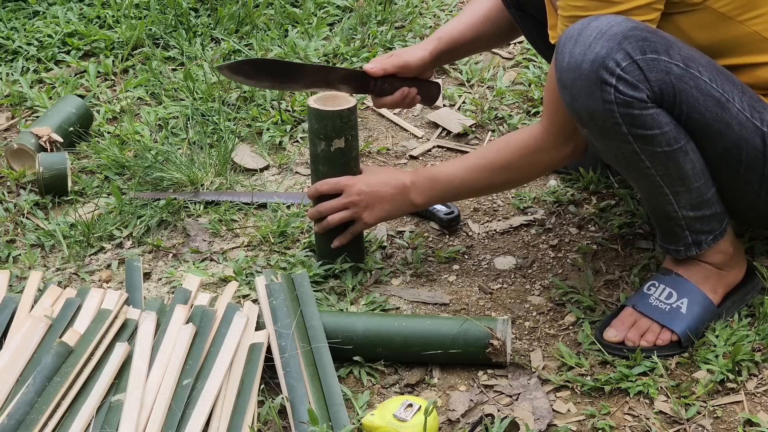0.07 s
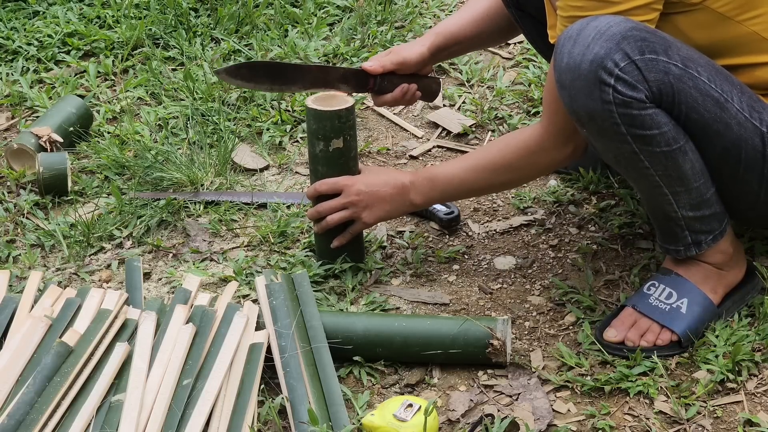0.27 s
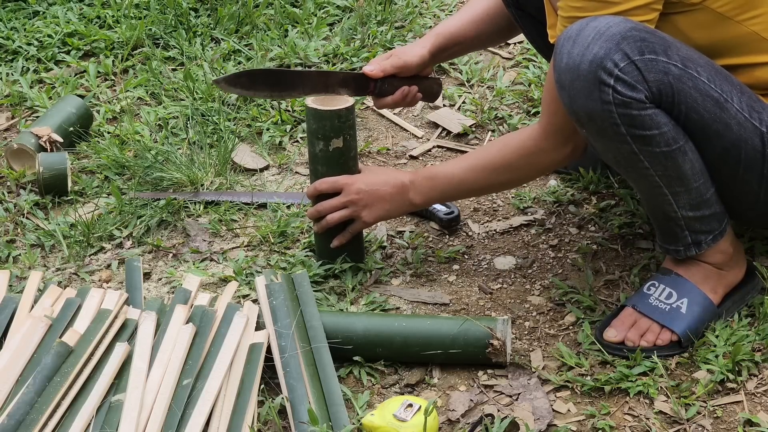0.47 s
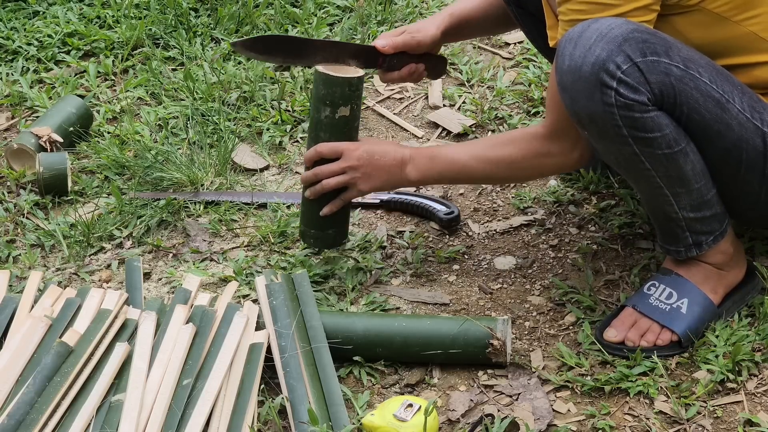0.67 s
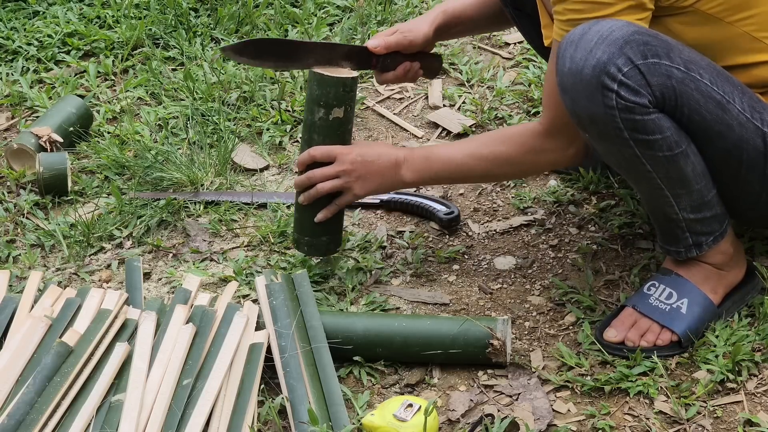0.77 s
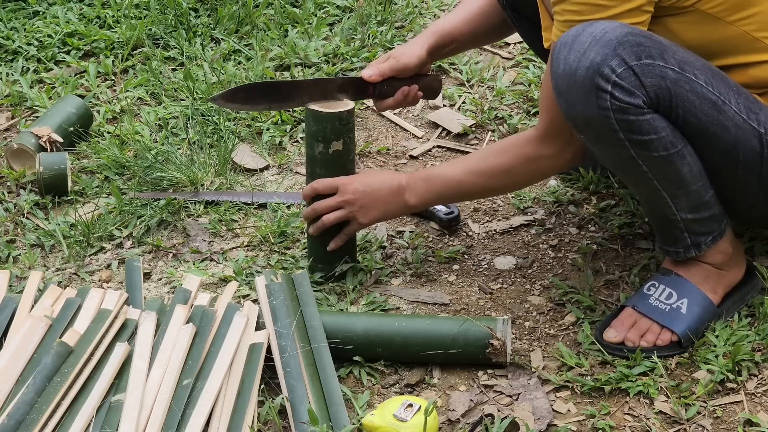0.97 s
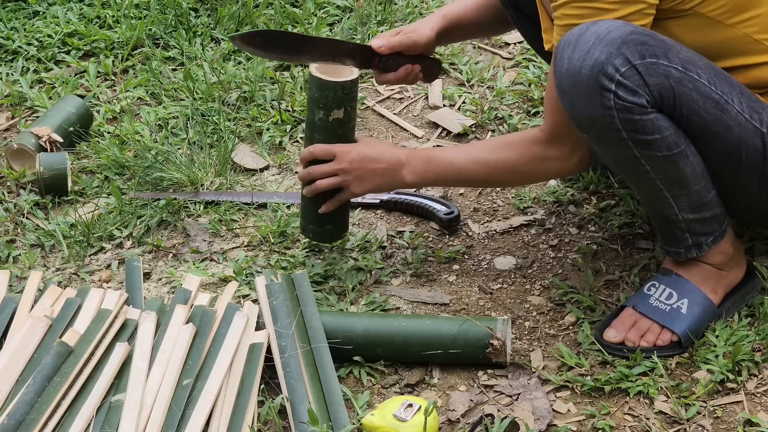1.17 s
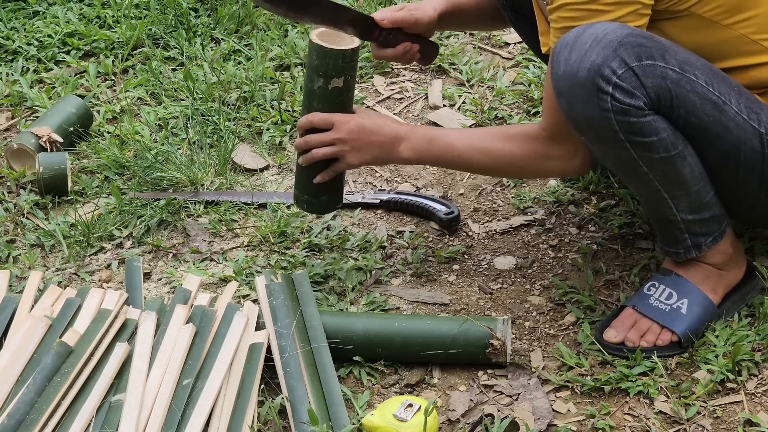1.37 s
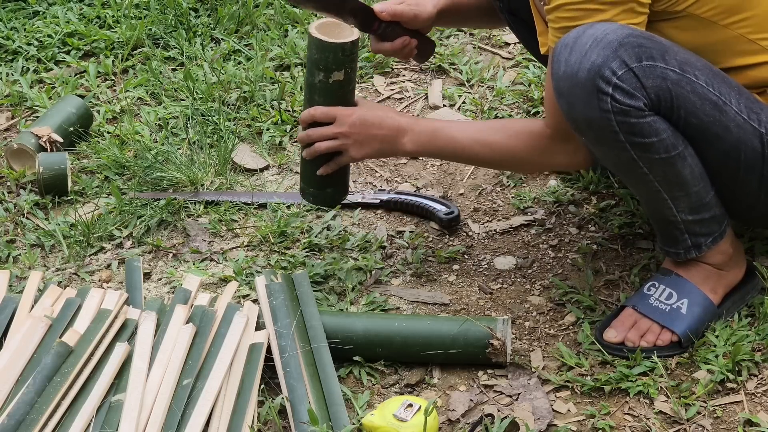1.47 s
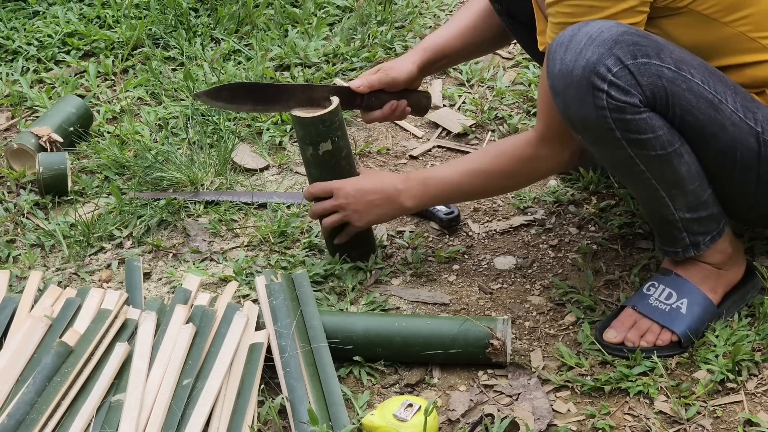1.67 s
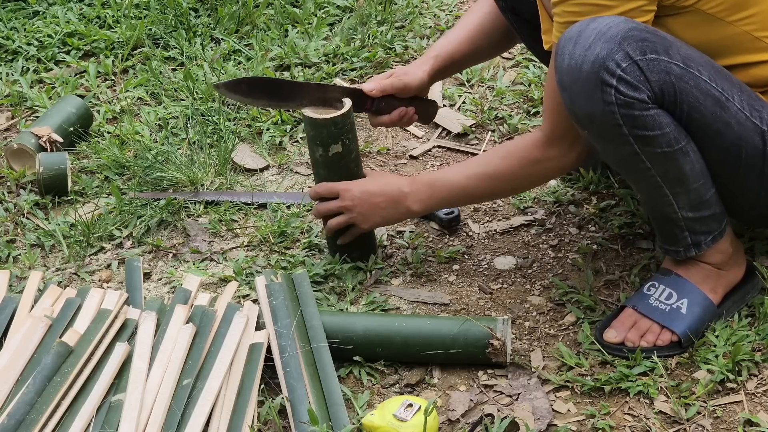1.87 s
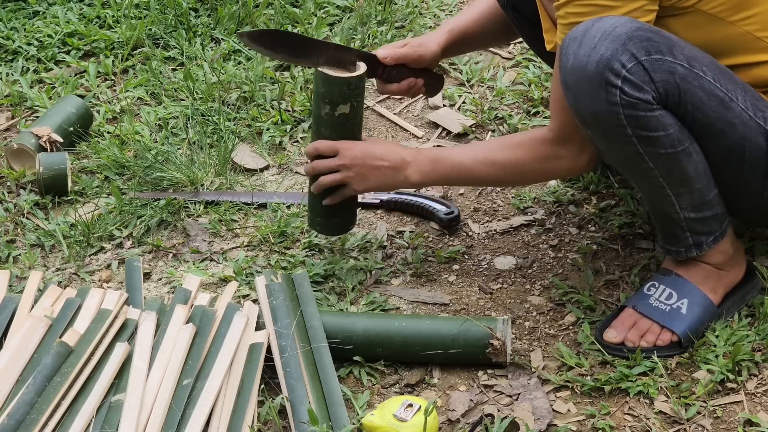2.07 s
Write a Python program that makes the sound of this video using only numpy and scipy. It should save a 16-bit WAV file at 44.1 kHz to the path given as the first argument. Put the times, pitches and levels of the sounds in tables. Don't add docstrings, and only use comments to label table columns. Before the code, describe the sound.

A machete chops twice into an upright bamboo tube outdoors, the second knock much louder.

```python
import sys
import numpy as np
from scipy import signal
from scipy.fft import rfft, irfft, next_fast_len
from scipy.io import wavfile
from scipy.ndimage import map_coordinates

SR = 44100
rng = np.random.default_rng(int(sys.argv[2]) if len(sys.argv) > 2 else 0)


def decibels_to_gain(level_db):
    exponent = np.asarray(level_db, float) / 20
    return 10 ** exponent


def master_out(mix):
    frames = np.transpose(np.atleast_2d(mix))
    ceiling = np.clip(frames, -1, 1)
    pcm = np.round(ceiling * 32767).astype(np.int16)
    wavfile.write(sys.argv[1], SR, pcm)


N = 93447

# frequency in Hz, left over right in dB.
STREAM_PAN = [(200, -0.5), (2400, 0), (4400, -2), (8000, -2), (15000, 0)]
STREAM_LAG_S = 0.000453


def unit(x):
    return x / np.sqrt(np.mean(x ** 2) + 1e-20)


def along(points, hz):
    f, v = np.transpose(points)
    return np.interp(np.log(hz + 1), np.log(f + 1), v)


def wobble(rate):
    knots = rng.standard_normal(int(N * rate / SR) + 4)
    return map_coordinates(knots, [np.arange(N) * rate / SR])


def filtered(x, response):
    m = next_fast_len(N + 8192)
    return irfft(rfft(x, m) * response(np.fft.rfftfreq(m, 1 / SR)), m)[..., :N]


def placed(x, lag_s, pan):
    side = np.array([[1], [-1]])

    def ports(hz):
        return decibels_to_gain(side * along(pan, hz) / 2) * np.exp(1j * np.pi * side * lag_s * hz)

    return filtered(x, ports)


def band(hz, centre_hz, width_hz):
    return 1j * hz * width_hz / (centre_hz ** 2 - hz ** 2 + 1j * hz * width_hz)


def diffuse(colour):
    # frequency in Hz, share of the power common to both ports (0-1).
    shared = [(200, 0.99), (500, 0.96), (1500, 0.2), (5000, 0.083), (15000, .1)]
    noise = rng.standard_normal((3, N))

    def share(hz):
        return np.clip(along(shared, hz), 0, 1)

    common = filtered(noise[0], lambda hz: colour(hz) * np.sqrt(share(hz)))
    separate = filtered(noise[1:], lambda hz: colour(hz) * np.sqrt(1 - share(hz)))
    return unit(placed(common + separate, STREAM_LAG_S, STREAM_PAN))


def stream():
    # frequency in Hz, level in dB.
    colour = [(120, -23), (200, -9), (347, -8.5), (432, -5), (3190, -9.5), (4770, -5), (6760, -7.5),
              (7680, -7), (16000, -32)]
    return decibels_to_gain(-50.5 + 0.15 * wobble(2.4)) * diffuse(lambda hz: decibels_to_gain(along(colour, hz)))


def drone():
    # frequency in Hz, level in dB.
    colour = [(12, -52), (20, -28), (31, -1.5), (54, -5), (66, -0.5), (75, -5.5), (127, -4), (300, -23.5),
              (390, -26), (660, -120)]
    return decibels_to_gain(-55.5 + 1.5 * wobble(6)) * diffuse(lambda hz: decibels_to_gain(along(colour, hz)))


def engine():
    # time in seconds, level of the firing note in dB.
    swell = [(0.0, -56), (0.42, -51.5), (0.77, -58), (1.11, -56), (1.41, -60), (2.12, -55)]
    s, db = np.transpose(swell)
    level = decibels_to_gain(np.interp(np.arange(N) / SR, s, db) + 4.0 + 1.5 * wobble(9))
    firing_hz = 51.3 + .8 * wobble(4.4)
    drift = 0.47 * np.array([wobble(5.15), wobble(5.7)])
    return level * np.sin(2 * np.pi * np.cumsum(firing_hz) / SR + drift)


def insects():
    # centre in Hz, width in Hz, level in dB.
    choirs = [(7510, 500, -54), (4000, 1200, -58.5), (5480, 900, -59.5), (9580, 2200, -60),
              (4743, 300, -60)]
    return sum(decibels_to_gain(db + .8 * wobble(25)) * diffuse(lambda hz: band(hz, centre_hz, width_hz) ** 2)
               for centre_hz, width_hz, db in choirs)


def slide(s, length_s, from_hz, to_hz, db):
    u = np.clip((np.arange(N) / SR - s) / length_s, 0, 1)
    cycles = length_s * (from_hz * u + (to_hz - from_hz) * u * u / 2)
    return decibels_to_gain(db) * np.sin(np.pi * u) * np.sin(2 * np.pi * cycles)


def bird():
    # start in seconds, length in seconds, first pitch in Hz, last pitch in Hz, level in dB.
    calls = [
        (.012, .014, 4200, 4700, -52),
        (.055, .014, 4800, 4550, -52),
        (.12, .016, 4800, 4550, -51),
        (.236, .032, 4850, 4050, -50),
    ]
    return sum(slide(*call) for call in calls)


def cricket():
    # middle of the first pulse in seconds, number of pairs, level in dB.
    phrases = [
        (.360, 2, -53),
        (.4415, 9, -47.5),
        (1.404, 1, -51),
        (1.445, 10, -47.5),
    ]
    pair_s, gap_s, pulse_s = .0408, .0135, .009
    x = np.zeros(N)
    for s, pairs, db in phrases:
        for pair in range(round(pairs)):
            for pulse in range(2):
                jitter, level = rng.standard_normal(2)
                start = s + pair * pair_s + pulse * gap_s - pulse_s / 2 + .0008 * jitter
                x += slide(start, pulse_s, 4980, 4980 - 450, db + level)
    return x


def singers():
    # frequency in Hz, left over right in dB.
    singer_pan = [(4000, -6)]
    return placed(bird() + cricket(), STREAM_LAG_S, singer_pan)


def shuffle():
    # start in seconds, level in dB, 60 dB decay in seconds, centre in Hz, width in Hz.
    shifts = [
        (0.886, -50, 0.8, 200, 194),
        (1.629, -49.5, .6, 157, 120),
        (1.654, -46.5, 0.54, 570, 250),
    ]
    t = np.arange(N) / SR
    x = 0
    for s, db, t60, centre_hz, width_hz in shifts:
        level = (t > s) * decibels_to_gain(db - 60 * np.abs(t - s) / t60 + 1.9 * wobble(40.87))
        x = x + level * diffuse(lambda hz: band(hz, centre_hz, width_hz))
    return x


def yard(x):
    # frequency in Hz, 60 dB decay in seconds.
    decay = [(150, .25), (1000, .12), (4000, .08), (14000, .14)]
    hz, t, z = signal.stft(rng.standard_normal((2, SR // 2)), SR, nperseg=256)
    tail = signal.istft(z * decibels_to_gain(-60 * t / along(decay, hz)[:, None]), SR, nperseg=256)[1]
    tail = tail / np.linalg.norm(tail[0])
    delayed = np.pad(x, (500, 0))
    return signal.fftconvolve(delayed[None], tail, axes=1)[:, :N]


def ring(s, db, hz, t60, attack_s):
    t = np.clip(np.arange(N) / SR - s, 0, None)
    return decibels_to_gain(db - 60 * t / t60) * np.sin(2 * np.pi * hz * t) * (1 - np.exp(-t / attack_s))


def foot():
    # start in seconds, level in dB, pitch in Hz, 60 dB decay in seconds.
    shoves = [
        (0.873, -28, 150, .04),
        (1.6061, -6.5, 138.4, 0.027),
        (1.612, -18, 236, 0.034),
    ]
    # start in seconds, level in dB, pitch in Hz, 60 dB decay in seconds.
    thumps = [
        (0.8797, -26, 79, 0.061),
        (0.907, -38.5, 91, .06),
        (0.946, -41, 80, 0.043),
        (1.012, -41, 110, 0.028),
    ]
    down = sum(ring(*shove, attack_s=0.0029) for shove in shoves)
    return sum(ring(*thump, attack_s=0.0014) for thump in thumps) - down


def air_column():
    pop_s = [1.6162, 1.6227, 1.6355, 1.641]
    pop_db = [
        -24.5,
        -11.5,
        -40,
        -38,
    ]
    return sum(ring(s, db, hz=622, t60=.025, attack_s=.0003) for s, db in zip(pop_s, pop_db))


def jolted(times, jolts, modes):
    t = np.arange(N) / SR
    choke_t60 = .011
    x = np.zeros(N)
    for s, (db, bright_db, free_s) in zip(times, jolts):
        wall = 0
        for hz, level, t60 in modes:
            scatter_db = 1.5 * rng.standard_normal()
            tilt_db = bright_db * np.log2(hz / 1141)
            wall = wall + ring(s, db + level + tilt_db + scatter_db, hz, t60, attack_s=.0003)
        x += wall * decibels_to_gain(-60 * np.clip(t - s - free_s, 0, None) / choke_t60)
    return x


def tube_wall():
    # pitch in Hz, level in dB, 60 dB decay in seconds.
    gripped = [(286, -12.5, 0.026), (493, -10.5, 0.0083), (659, -8.5, 0.013), (914, -8, 0.017),
               (1110, -4.5, 0.031), (1570, -4.5, 0.016), (2060, 1, 0.029), (2420, -4, 0.018),
               (2770, -1, 0.017), (3190, -4.5, 0.016), (3663, 2, 0.048), (4500, -6, .01),
               (5240, -22, 0.0033)]
    # pitch in Hz, level in dB, 60 dB decay in seconds.
    free = [(825, -20, .03), (1141, 0, .06), (1405, -8, .04), (1900, -11, .025), (2035, -5, .035),
            (2300, -8, .03), (2450, -11, .025), (3600, -12, .02), (4720, -15, .02)]
    tap_s = [.8726, .8751, .8763, .8845]
    # level in dB, brightness in dB per octave, free ringing in seconds.
    tap = [
        (-22, -3, .0015),
        (-21, -3, .003),
        (-20, 1, .003),
        (-40, 1, .003),
    ]
    chop_s = [1.6030, 1.6071, 1.60885, 1.6142, 1.6186, 1.6372, 1.6416]
    # level in dB, brightness in dB per octave, free ringing in seconds.
    chop = [
        (-24.5, 2, 0.0056),
        (-10.5, 1.5, 0.0032),
        (-12.5, -13, 0.0037),
        (-11, 0.5, 0.005),
        (-17.5, -2.5, 0.0024),
        (-35.5, -16, 0.0044),
        (-38, -19, 0.0034),
    ]
    return jolted(tap_s, tap, gripped) + jolted(chop_s, chop, free)


def fibres():
    tear_s = [.863, .8722, .8755, .883, 1.6005, 1.6062, 1.6125, 1.622]
    # rise in seconds, hold in seconds, 60 dB decay in seconds, level in dB.
    tears = [
        (0.0051, 0.003, .02, -40),
        (0.0005, .002, .02, -46),
        (0.0006, 0.0013, 0.017, -24),
        (0.00093, .003, 0.036, -40.5),
        (0.0024, .003, .02, -31),
        (0.0015, 0.0028, 0.036, -16),
        (0.0042, 0.0046, .005, -24.5),
        (0.0014, 0.0044, 0.2, -38.5),
    ]
    # frequency in Hz, level in dB.
    colour = [(300, -36), (1000, -20), (2800, -11), (4600, -3), (8000, -5), (10500, -3), (13500, -6),
              (16000, -9)]
    # centre in Hz, width in Hz, level in dB.
    blade = [(6830, 150, 1.5), (10900, 300, -5.5), (13600, 670, -8.5)]
    t = np.arange(N) / SR
    env = np.zeros(N)
    for s, (rise, hold, t60, db) in zip(tear_s, tears):
        fall = decibels_to_gain(db - 60 * np.clip(t - s - rise - hold, 0, None) / t60)
        env += fall * np.clip((t - s) / rise, 0, 1) ** 2

    def tint(hz):
        steel = sum(decibels_to_gain(db) * band(hz, centre_hz, width_hz) for centre_hz, width_hz, db in blade)
        return decibels_to_gain(along(colour, hz)) * (1 + steel)

    alike = .7
    noise = rng.standard_normal((3, N))
    pair = np.sqrt(alike) * noise[0] + np.sqrt(1 - alike) * noise[1:]
    grains = decibels_to_gain(2.5 * wobble(1500))
    return unit(filtered(pair * grains, tint)) * env


def scene():
    # frequency in Hz, left over right in dB.
    hit_pan = [(100, 3), (600, 1), (2400, -6), (10000, -2.5), (15000, -0.5)]
    bed = stream() + drone() + engine() + insects() + singers() + shuffle()
    body = tube_wall() + air_column() + foot()
    tear = fibres()
    chops = placed(body, 4.5e-5, hit_pan) + placed(tear, 3e-5, hit_pan)
    scatter = decibels_to_gain(-35) * yard(body + tear.mean(axis=0))
    return bed + scatter + chops


def band_limit(x):
    return signal.sosfilt(signal.butter(12, 16170, fs=SR, output="sos"), x)


def record(dry):
    # centre in Hz, width in Hz, depth (0-1).
    port_dip = (6940, 390, 0.34)
    dip_hz, width_hz, depth = port_dip

    def microphone(hz):
        port = 1 - depth * np.exp(-((hz - dip_hz) / width_hz) ** 2)
        low_cut = 1 / (1 + (51 / (hz + 1)) ** 4) ** .5
        return port * low_cut * (hz < 16170)

    return band_limit(filtered(dry, microphone))


dry = scene()
out = record(dry)
master_out(out)
```